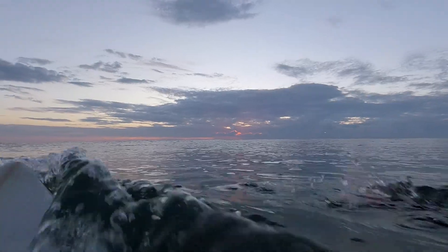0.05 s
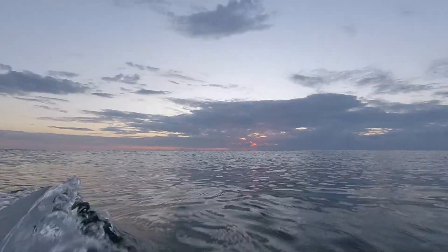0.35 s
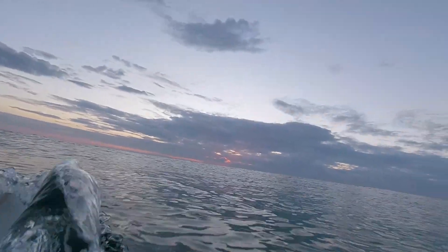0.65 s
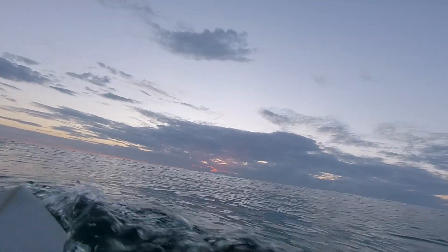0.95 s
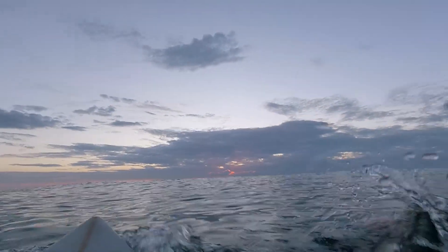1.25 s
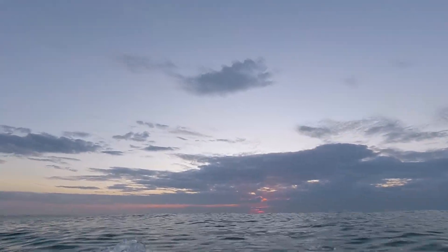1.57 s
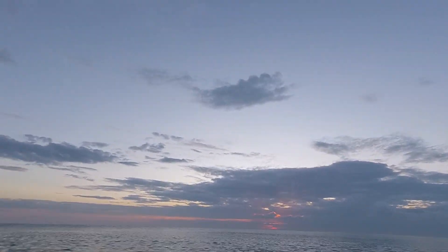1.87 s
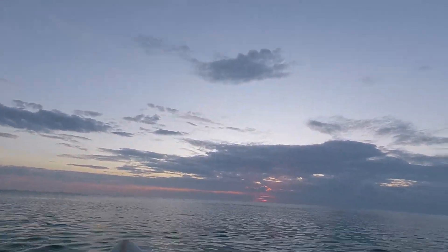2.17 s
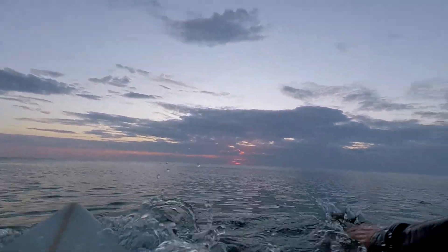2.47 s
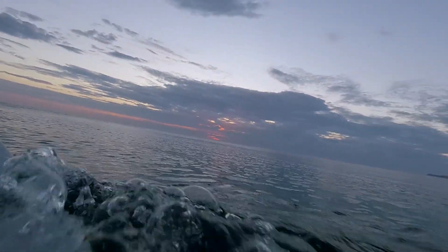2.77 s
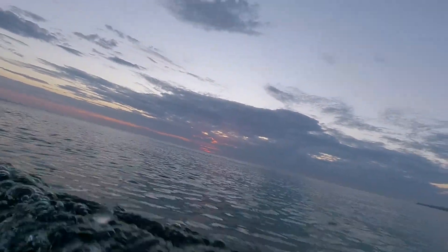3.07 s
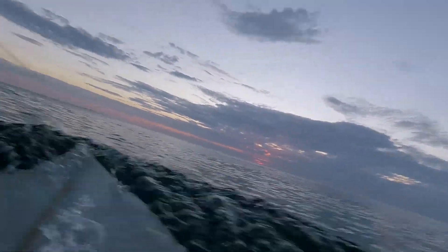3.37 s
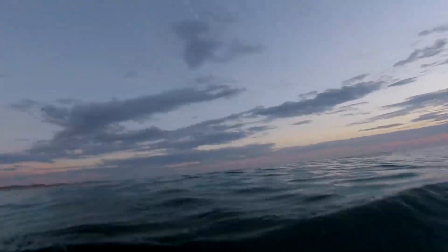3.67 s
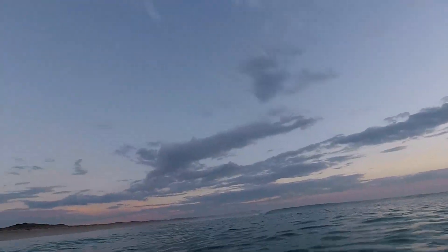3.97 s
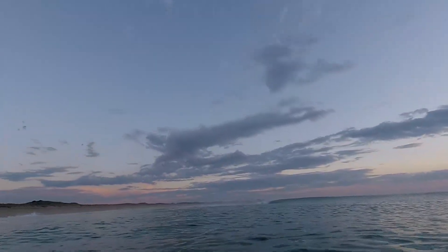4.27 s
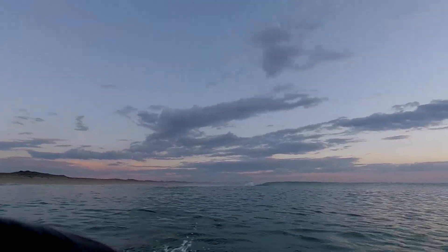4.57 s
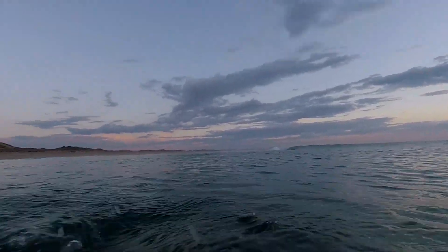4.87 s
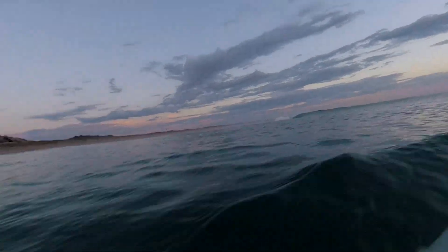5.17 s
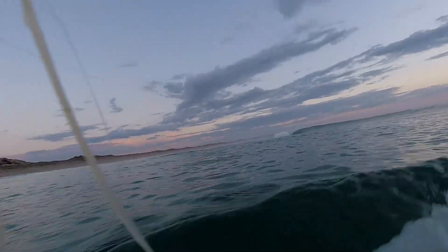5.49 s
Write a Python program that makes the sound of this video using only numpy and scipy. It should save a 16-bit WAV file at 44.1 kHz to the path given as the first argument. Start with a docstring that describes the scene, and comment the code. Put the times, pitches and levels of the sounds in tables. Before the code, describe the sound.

Muffled bubbling water washes round a paddled surfboard, with slaps, gurgles and drops popping on a wet microphone, growing gradually fuller.

```python
"""Sea water washing round a paddled surfboard, heard from a sealed, wet microphone on the deck.
Clouds of ringing bubbles make the bed: churn under the hull, wash along the rails, fizz and foam
at the nose, all riding the flow over the rumble of the rocking board. A film of water on the
microphone port sings, gurgles and muffles the treble. Trapped air gulps and slaps, spray hisses,
and drops tick on the housing and pop the wet port. Faint, whistly bands of hiss sit on top."""
import sys
import numpy as np
from scipy import signal
from scipy.fft import rfft, irfft
from scipy.io import wavfile
from scipy.ndimage import uniform_filter1d, minimum_filter1d

SR = 44100
rng = np.random.default_rng(int(sys.argv[2]) if len(sys.argv) > 2 else 0)


def inscribe(sig):
    """Save sig as 16-bit PCM at rate SR to the path in sys.argv[1].

    A 1-D sig is mono; a 2-D sig holds one channel per row.
    Samples are clipped to [-1, 1] before scaling.
    """
    pcm = np.round(np.clip(np.atleast_2d(sig).T, -1, 1) * 32767)
    wavfile.write(sys.argv[1], SR, pcm.astype(np.int16))


N = 252693

# Water flowing past the board. Each row: time in seconds, strength in dB against full speed.
FLOW = [(0, -4.5), (.17, -4.5), (.25, -13.5), (.33, -10), (.55, -8.5), (.68, -9.5), (.8, -8), (.97, -5.5),
        (1.22, -6.5), (1.43, -3), (1.645, -3.5), (1.665, -8), (1.76, -1.5), (2.0, -3), (2.5, -2.5),
        (3.25, -2.5), (3.4, -3.5), (3.55, -2), (3.83, -3), (4.3, 0), (4.5, -1), (4.8, 1), (5.0, -1),
        (5.38, 0), (5.5, -1.34), (5.73, 0)]
# The rumble's fader ride. Each row: time in seconds, level in dB.
ROCKING = [(0, -41), (.17, -28), (.3, -35.5), (.44, -46), (.56, -34), (.88, -34), (1.02, -30), (1.36, -36),
           (1.5, -26), (2.1, -27.5), (2.5, -23.5), (3.0, -21.5), (3.42, -27.5), (3.68, -24), (4.55, -23.5),
           (5.1, -20), (5.73, -24.5)]
# Tone curves of the noise layers. Each row: frequency in Hz, relative level in dB.
ROCK_EQ = [(10, 5), (20, 5), (29, -4.5), (40, -10), (55, -8.5), (90, -10.5), (200, -44)]
CHURN_EQ = [(40, -14.5), (75, -6), (125, 0), (195, -3), (300, -3.5), (400, -8.5), (550, -12), (1100, -24)]
WASH_EQ = [(180, -4), (380, -0.5), (550, 1.5), (850, 3), (1250, 2.5), (1600, -9), (2300, -52)]
FIZZ_EQ = [(900, -23), (1300, -2.5), (1600, 3.5), (1850, -0.5), (2200, -11.5), (2800, -44), (4000, -45)]
FOAM_EQ = [(1600, -1.5), (2100, 0), (2500, -3), (2900, -8.5), (3400, -13.5), (4100, -17.5), (4700, -68),
           (6000, -62.5)]
SPRAY_EQ = [(3000, 3), (4100, -7.5), (4800, -7.5), (5800, -7.5), (6700, -1.5), (8500, -3), (10000, -7.5),
            (12000, -14), (14500, -27.5)]
HOLLOW_EQ = [(30, -19), (60, -7.5), (205, -3), (254, 5.5), (320, -4), (450, -15.5), (518, 9.5),
             (627, -24.5), (772, 0), (1230, -38), (2310, -33.5), (3820, -45), (9000, -58), (14000, -65)]
# Water breaks over the nose. Each row: start and length in seconds, wash and fizz levels in dB.
SPLASHES = [(0, 0.0026, -42, -19), (0.046, 0.081, -31, -42), (0.172, 0.014, -22, -53),
            (0.465, 0.038, -37, -41), (0.913, 0.16, -33.5, -56), (1.37, 0.085, -28.5, -32),
            (1.49, 0.11, -30, -45), (1.602, 0.035, -36, -23), (2.05, 0.04, -32, -27.5),
            (2.21, 0.11, -36, -36), (2.513, 0.072, -27, -28.5), (2.607, 0.087, -40, -28),
            (2.712, 0.035, -23.5, -31), (2.822, 0.15, -37, -30), (2.98, 0.051, -50, -24),
            (3.552, 0.17, -32.5, -30), (3.949, 0.14, -26.5, -25), (4.087, 0.069, -25, -24.5),
            (4.346, 0.078, -26.5, -31), (4.604, 0.02, -26, -29), (4.762, 0.124, -35.5, -31.5),
            (5.032, 0.053, -30, -30), (5.16, 0.042, -28, -49), (5.343, 0.08, -25, -25),
            (5.557, 0.036, -24, -27)]
# The board ploughs in. Each row: start and length in seconds, churn, wash and foam levels in dB.
SURGES = [(1.609, 0.32, -16, -30.5, -31.5), (2.618, 0.34, -39, -28.5, -37.5), (2.938, 0.36, -18, -29, -35),
          (4.586, 0.25, -27.5, -49, -42)]
# The film's note, sinking as the film thickens. Each row: time in seconds, pitch in Hz.
FILM_PITCH = [(0, 1690), (.2, 1930), (.27, 2800), (.42, 2230), (.6, 2510), (.79, 1680), (1.0, 1900),
              (1.28, 1740), (1.47, 2490), (1.85, 2810), (2.12, 2235), (2.6, 2270), (2.69, 1780),
              (2.9, 1710), (3.12, 2910), (3.5, 2920), (3.62, 1850), (3.8, 1510), (4.15, 1550), (4.7, 1695),
              (5.73, 1650)]
# A faint, wandering band of hiss. Each row: time in seconds, centre in Hz, level in dB.
TREBLE_HISS = [(0, 5200, -67), (.1, 5040, -72), (.32, 5000, -76), (.39, 4900, -82), (.46, 4600, -70),
               (.63, 4600, -76), (.7, 5000, -70), (.85, 4300, -65), (1.0, 3930, -63.5), (2.6, 3930, -61.5),
               (3.2, 4680, -64), (3.75, 4000, -71), (4.75, 4500, -68.5), (5.73, 3950, -82)]
# Faint, thin, whistly bands of hiss in the treble, some sliding in pitch.
# Each row: start and length in seconds, first and last pitch in Hz, level in dB, sharpness as Q.
WHISTLES = [(.02, 0.18, 6660, 6550, -62, 8), (.16, 0.021, 4960, 5050, -50, 6.6),
            (.25, .14, 6440, 6480, -70, 12), (.41, 0.21, 6600, 6900, -75, 9),
            (.49, 0.27, 9300, 9300, -74, 6.3), (.66, 0.12, 3870, 3900, -64, 7.4),
            (.66, .38, 5350, 4370, -72, 12), (3.81, 0.22, 7740, 7400, -65, 2.3)]
# A sheet of water runs over the port with a gliding gurgle. Each row reads as in WHISTLES.
GURGLES = [(.176, 0.019, 2010, 1886, -24, 6.4), (.282, 0.031, 2860, 2330, -38, 3.3),
           (.66, 0.084, 2450, 2040, -48, 9), (.74, 0.15, 1850, 1690, -49, 7.3),
           (1.41, 0.28, 1430, 1664, -29, 5.2), (1.595, 0.04, 2470, 2480, -30, 5.5),
           (1.67, 0.079, 2020, 1880, -30, 7.8), (2.1, 0.47, 2114, 2336, -37, 7.8),
           (2.58, .06, 2370, 2870, -40.5, 5), (2.655, 0.36, 1615, 1626, -29.5, 4.3),
           (2.718, 0.056, 1200, 1500, -23.5, 4.6), (2.83, 0.25, 2850, 2930, -40.5, 4.3),
           (2.885, 0.049, 590, 1000, -29.5, 3), (2.94, 0.058, 2820, 2370, -25, 2.9),
           (2.94, 0.12, 1830, 1910, -21.5, 2.8), (3.63, 0.023, 2640, 2550, -29.5, 4.2),
           (3.64, 0.057, 1080, 1390, -28.5, 2.4), (3.665, 0.041, 2620, 2570, -44, 33),
           (4.215, 0.1, 940, 1135, -24, 2.3), (4.22, 0.14, 325, 220, -25.5, 2.8)]
# Single large bubbles gulp, and the hull slaps shut on big pockets of air.
# Each row: start in seconds, peak level in dB, starting pitch in Hz.
GULPS = [(.170, -10, 625), (1.143, -17.5, 580), (1.3165, -20, 950), (1.591, -9.5, 750), (1.619, -20, 590),
         (2.586, -13.5, 1530), (2.6788, -13.5, 1570), (2.7386, -24, 1270), (2.7735, -12, 1610),
         (2.804, -13, 1530), (2.8733, -13, 1400), (2.892, -11, 553), (2.924, -17, 940), (2.989, -18, 2280),
         (3.034, -8, 1820), (3.044, -13, 1800), (3.0905, -16, 1620), (3.1058, -14, 1520),
         (3.305, -13.5, 480), (3.367, -13.5, 2450), (3.697, -14, 593), (3.8098, -14.5, 1620),
         (3.866, -20, 1800), (3.8878, -10.5, 1560), (3.931, -12, 490), (4.03, -11.5, 328),
         (4.055, -12, 574), (4.108, -9.5, 1460), (4.139, -5, 291), (4.1665, -6.5, 1390), (4.179, -23, 1760),
         (5.0873, -13.5, 1620), (5.371, -11, 382), (5.375, -13, 1410)]
SLAPS = [(.176, -10, 175), (.187, -7.5, 110), (.189, -15.5, 300), (.218, -3, 184), (.229, -4.5, 260),
         (.238, -7.5, 48.3), (.757, -8, 58.7), (.943, -18, 404), (1.364, -10, 160), (2.275, -17, 85),
         (2.815, -9.5, 133), (2.965, -9.5, 80), (3.727, -9, 53), (3.73, -17.5, 140), (5.126, -6.5, 53)]
# Drops hit the housing. Each row: start in seconds, ring level in dB, settled ring pitch in Hz,
# seconds for the ring to fall 60 dB, tick gain in dB, tick centre in Hz.
DROPS = [(0.175, -24, 3250, 0.007, -17, 6200), (0.1784, -35, 3180, 0.0053, -24, 8600),
         (0.191, -20, 2630, 0.0048, -19, 7800), (.1975, -16, 1840, 0.013, -30, 7500),
         (.2037, -28, 2070, 0.0067, -38, 9000), (0.214, -25, 1970, .006, -41, 8600),
         (.4392, -44, 2580, .005, -28.5, 6300), (0.4999, -10.5, 2040, 0.005, -26.5, 7900),
         (.632, -34, 3320, 0.0046, -44, 7500), (.6913, -27, 3150, 0.0026, -29, 7000),
         (.8412, -17.5, 2420, 0.003, -28, 6840), (0.9614, -8.5, 2190, 0.0078, -29.5, 7600),
         (1.0029, -11.5, 1440, 0.0043, -62, 7500), (1.143, -17.5, 2060, 0.0085, -40, 7350),
         (1.369, -38, 2100, .008, -32.5, 6600), (1.6453, -13, 1650, .007, -48, 6500),
         (1.6493, -5, 1820, 0.0078, -35, 7040), (2.404, -16, 1270, 0.0059, -57, 7500),
         (3.357, -15, 2000, 0.0026, -54, 6800), (3.4298, -13.5, 2220, 0.0027, -31.5, 6500),
         (3.468, -10, 1960, 0.004, -38, 6300), (3.8187, -8.5, 1880, 0.021, -17.5, 6660),
         (3.8192, -13, 2360, 0.0039, -20, 7200), (4.028, -17, 1770, .009, -26, 6300),
         (4.15, -6.5, 1650, 0.018, -37, 7500), (4.269, -27, 2520, 0.011, -48, 7500),
         (4.404, -28, 2280, .008, -35, 6000), (4.703, -39, 1900, .008, -37, 10000),
         (5.001, -13.5, 1540, 0.027, -52, 7500), (5.081, -29, 2800, 0.01, -44, 7500),
         (5.232, -39, 1900, .008, -38, 7650), (5.655, -27, 2670, 0.0074, -50, 7500)]
# Spray showers the housing. Each row: start and length in seconds, level in dB, release in seconds.
SHOWERS = [(0.176, 0.025, -50.5, 0.011), (0.542, .008, -59, 0.015), (2.72, 0.024, -63, 0.0064),
           (3.82, 0.15, -84, 0.072), (4, .015, -65, .02), (4.246, 0.018, -62, 0.012),
           (4.63, 0.083, -70, 0.087)]

SPLASH_ATTACK_RELEASE_S, SURGE_ATTACK_RELEASE_S = (0.012, 0.01), (0.12, 0.052)


def from_db(db):
    """Decibels to gain."""
    return 10 ** (np.asarray(db) / 20)


def rms_one(x):
    """Scale to unit power."""
    return x / np.sqrt(np.mean(x ** 2) + 1e-20)


def levelled(x, window):
    """Ride the gain to hold the power near 1 over a window of samples."""
    return x / np.sqrt(uniform_filter1d(x ** 2, size=window) + 1e-12)


def add(out, start, sound):
    """Mix a short sound in at a start in seconds."""
    i = int(np.clip(start * SR, 0, N - 1))
    out[i:i + len(sound)] += sound[:N - i]


def colour(x, eq):
    """Shape a sound by a tone curve that falls away steeply past both ends; unit power."""
    hz, db = np.transpose(eq)
    log_hz = np.log(np.arange(N // 2 + 1) * SR / N + 1e-3)
    outside = np.maximum(log_hz - np.log(hz[-1]), 0) + np.maximum(np.log(hz[0]) - log_hz, 0)
    shape = from_db(np.interp(log_hz, np.log(hz), db) - 50 * outside)
    return rms_one(irfft(rfft(x) * shape, N))


def drift(rate_hz):
    """A smooth random wobble with a spread of 1."""
    step = 40   # samples per control point
    pole = np.exp(-2 * np.pi * rate_hz * step / SR)
    noise = rng.standard_normal(N // step + 2002)
    slow = signal.lfilter([1], [1, -2 * pole, pole * pole], noise)[2000:]
    return np.interp(np.arange(N) / step, np.arange(len(slow)), rms_one(slow))


def automation(rows):
    """One value per sample for each column after the time."""
    times, *columns = np.transpose(rows)
    return [np.interp(np.arange(N) / SR, times, column) for column in columns]


def envelope(start, length, attack, release):
    """Rise, hold until the length is over, die away."""
    age = np.arange(N) / SR - start
    return np.clip(age / attack, 0, 1) * np.exp(-np.clip((age - length) / release, 0, 20))


def bursts(rows, attack, release):
    """Summed envelopes of a cue list, one gain curve per level column."""
    return sum(np.outer(from_db(levels), envelope(start, length, attack, release))
               for start, length, *levels in rows)


def flow_gain(db, follow, thin_db=0):
    """Move a base level by follow dB per dB of flow, and by thin_db per octave of film pitch."""
    thinness = np.log2(automation(FILM_PITCH)[0] / 2000)
    return from_db(db + follow * automation(FLOW)[0] + thin_db * thinness)


def bubbles(low_hz, high_hz, cycles, spread_db, rise, count):
    """Bubbles of random size ring for some cycles, rising in pitch as they near the surface."""
    out = np.zeros(N)
    for when, size, strength, damping, sign in rng.random((count, 5)):
        hz = low_hz * (high_hz / low_hz) ** size
        t60 = cycles * 2 ** (2 * damping - 1) / hz
        age = np.arange(int(t60 * SR) + 1) / (t60 * SR)
        level_db = spread_db * min(-np.log(1 - strength), 3.5)
        phase = 2 * np.pi * hz * t60 * age * (1 + rise * age / 2)
        ring = np.sin(phase) * np.exp(-np.log(1000) * age)
        add(out, when * N / SR, np.sign(sign - .5) * from_db(level_db) * ring)
    return out


def water(eq, grains, grain_share, flicker_db, flicker_hz):
    """Single close bubbles over the blur of countless far ones, arriving in lumps."""
    close = np.sqrt(grain_share) * colour(grains, eq)
    far = np.sqrt(1 - grain_share) * colour(rng.standard_normal(N), eq)
    return levelled((close + far) * from_db(flicker_db * drift(flicker_hz)), window=7000)


def resonance(hz, q, flicker_db, stages=4, block=400):
    """Flickering noise through a steep-sided resonance that follows a pitch curve."""
    noise = rng.standard_normal(len(hz)) * from_db(flicker_db * drift(35)[:len(hz)])
    out, state = np.zeros(len(hz)), np.zeros((stages, 2))
    for i in range(0, len(hz), block):
        angle = 2 * np.pi * hz[i] / SR
        pole = np.exp(-angle / (2 * q))
        gain = (1 - pole ** 2) / 2
        stage = [gain, 0, -gain, 1, -2 * pole * np.cos(angle), pole ** 2]
        out[i:i + block], state = signal.sosfilt([stage] * stages, noise[i:i + block], zi=state)
    return levelled(out, window=5000)


def rocking():
    """The board rocks on the swell with a deep rumble."""
    rumble = levelled(colour(rng.standard_normal(N), ROCK_EQ), window=9000)
    return from_db(automation(ROCKING)[0]) * rumble


def churn(accents):
    """Big bubbles under the hull give the water its low body."""
    grains = bubbles(68, 507, cycles=9.1, spread_db=1, rise=0.34, count=1100)
    bed = water(CHURN_EQ, grains, grain_share=0.39, flicker_db=0, flicker_hz=24)
    return np.hypot(flow_gain(-23.5, follow=2.34), accents) * bed


def wash(accents):
    """Middle-sized bubbles run along the rails and fill the midrange."""
    grains = bubbles(340.1, 1528, cycles=32.2, spread_db=3, rise=0.21, count=2200)
    bed = water(WASH_EQ, grains, grain_share=0.53, flicker_db=1.5, flicker_hz=83)
    return np.hypot(flow_gain(-25, follow=1.46, thin_db=1), accents) * bed


def fizz(accents):
    """Small bubbles sparkle at the nose, louder when the film is thin."""
    grains = bubbles(1174, 2324, cycles=41, spread_db=4.5, rise=0.075, count=2200)
    bed = water(FIZZ_EQ, grains, grain_share=0.75, flicker_db=2, flicker_hz=98)
    return np.hypot(flow_gain(-28.5, follow=2, thin_db=4.5), accents) * bed


def foam_cloud():
    """The finest bubbles ring high and short."""
    grains = bubbles(1788, 4420, cycles=20, spread_db=-1, rise=0.038, count=2800)
    return water(FOAM_EQ, grains, grain_share=0.74, flicker_db=2.5, flicker_hz=13)


def under_film(x, order=10, block=900):
    """The film on the port muffles everything from a little above its own pitch."""
    edge_hz = 1.163 * automation(FILM_PITCH)[0]
    out, state = np.zeros(N), np.zeros((order // 2, 2))
    for i in range(0, N, block):
        muffle = signal.butter(order, edge_hz[i], fs=SR, output="sos")
        out[i:i + block], state = signal.sosfilt(muffle, x[i:i + block], zi=state)
    return out


def foam(splashed, thrown):
    """Foam is dull through the film, bright where it leaks past or is thrown at the port."""
    dull = np.hypot(flow_gain(-33, follow=1.3, thin_db=12.5), splashed) * under_film(foam_cloud())
    bright = np.hypot(flow_gain(-42.5, follow=1.44), thrown) * foam_cloud()
    return dull + bright


def film():
    """Water lying over the port sings with the flow, higher and softer as it drains."""
    note = resonance(automation(FILM_PITCH)[0], q=7, flicker_db=2.5)
    return flow_gain(-37, follow=0.99, thin_db=-5.5) * note


def treble_hiss():
    """A faint, flickering hiss wanders between about 4 and 5 kHz."""
    hz, db = automation(TREBLE_HISS)
    return from_db(db) * resonance(hz, q=4.2, flicker_db=5)


def spray(accents):
    """A faint hiss with the prickle of tiny droplets."""
    droplets = bubbles(4000, 12000, cycles=18, spread_db=3, rise=.05, count=900)
    mist = water(SPRAY_EQ, droplets, grain_share=0.15, flicker_db=0.8, flicker_hz=9.7)
    return np.hypot(flow_gain(-63, follow=1.28), accents) * mist


def glides(rows, flicker_db, attack_s=0.032, release_s=0.024):
    """Narrow bands of noise swell for a moment, sliding from one pitch to another."""
    out = np.zeros(N)
    t = np.arange(SR // 2) / SR
    for start, length, from_hz, to_hz, db, q in rows:
        hz = np.interp(t, [0, length], [from_hz, to_hz])
        shape = np.minimum(t / attack_s, 1) * np.exp(-np.maximum(t - length, 0) / release_s)
        add(out, start, from_db(db) * shape * resonance(hz, q, flicker_db))
    return out


def air_pockets(rows, glide_octaves):
    """Trapped air swells into a brief ring and dies, gliding as the pocket changes size."""
    out = np.zeros(N)
    for start, db, hz in rows:
        swell_s = 0.0028 * (390 / hz) ** 0.36   # higher pockets swell faster
        age = np.arange(int(10 * swell_s * SR)) / (swell_s * SR)
        pitch = hz * 2 ** (glide_octaves * np.tanh(age / 2))
        shape = (age * np.exp(1 - age)) ** 1.05
        add(out, start, from_db(db) * shape * np.sin(2 * np.pi * np.cumsum(pitch) / SR))
    return out


def drops(splat_s=0.00041, sag=0.54, sag_s=0.00027, touch_s=0.00043, tick_width=1.27):
    """A drop ticks on the housing and pops the wet port, whose pitch sags as the water spreads."""
    rings, ticks = np.zeros((2, N))
    t = np.arange(SR // 20) / SR
    for start, ring_db, hz, t60, tick_db, tick_hz in DROPS:
        shape = (1 - np.exp(-t / touch_s)) ** 2 * np.exp(-np.log(1000) * t / t60)
        phase = 2 * np.pi * hz * (t + sag * sag_s * (1 - np.exp(-t / sag_s)))
        add(rings, start, from_db(ring_db) * shape / shape.max() * np.sin(phase))
        band_hz = [tick_hz / tick_width, tick_hz * tick_width]
        housing = signal.butter(3, band_hz, "band", fs=SR, output="sos")
        splat = t / splat_s * np.exp(-t / splat_s) * 2 * rng.standard_normal(len(t))
        add(ticks, start, from_db(tick_db) * signal.sosfilt(housing, splat))
    wet_port = signal.butter(10, 3850, fs=SR, output="sos")
    return signal.sosfilt(wet_port, rings + 1e-18) + ticks


def hollow_ring(full_db=-41, full_at_s=4.47, rise_db_per_s=12.5):
    """A faint, hollow ring fades up as the board gathers speed."""
    seconds_to_go = np.maximum(full_at_s - np.arange(N) / SR, 0)
    return from_db(full_db - rise_db_per_s * seconds_to_go) * colour(rng.standard_normal(N), HOLLOW_EQ)


def scene():
    """The water sits dead centre; only the hollow ring gives it stereo width."""
    splash_wash, splash_fizz = bursts(SPLASHES, *SPLASH_ATTACK_RELEASE_S)
    surge_churn, surge_wash, surge_foam = bursts(SURGES, *SURGE_ATTACK_RELEASE_S)
    showers = sum(from_db(db) * envelope(start, length, attack=0.0016, release=release)
                  for start, length, db, release in SHOWERS)
    bands = film() + treble_hiss() + glides(GURGLES, flicker_db=1.3) + glides(WHISTLES, flicker_db=5.4)
    sea = rocking() + churn(surge_churn) + wash(splash_wash + surge_wash) + fizz(splash_fizz)
    sea += foam(splashed=from_db(-10) * splash_fizz, thrown=surge_foam + from_db(22) * showers)
    pockets = air_pockets(GULPS, glide_octaves=0.11) + air_pockets(SLAPS, glide_octaves=-0.41)
    centre = sea + bands + spray(showers) + pockets + drops()
    side = hollow_ring()
    return np.array([centre + side, centre - side])


def record(dry, ceiling_db=-3.4, limiter_s=.004, fade_s=.01, cutoff_hz=16000):
    """A limiter holds the peaks down, the ends are eased in and out, and the very top is cut."""
    span = int(limiter_s * SR)
    allowed = np.minimum(from_db(ceiling_db) / (np.abs(dry).max(axis=0) + 1e-9), 1)
    gain = uniform_filter1d(minimum_filter1d(allowed, size=span), size=span)
    t = np.arange(N) / SR
    fades = np.clip(np.minimum(t, t[::-1]) / fade_s, 0, 1)
    top_cut = signal.cheby2(12, 70, cutoff_hz, fs=SR, output="sos")
    return signal.sosfilt(top_cut, dry * gain * fades)


dry = scene()
out = record(dry)
inscribe(out)
```